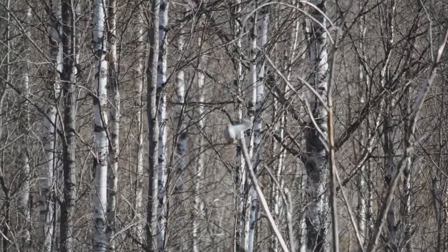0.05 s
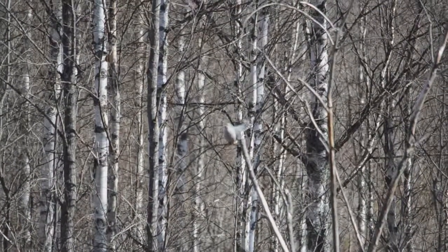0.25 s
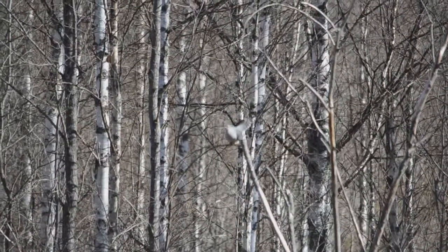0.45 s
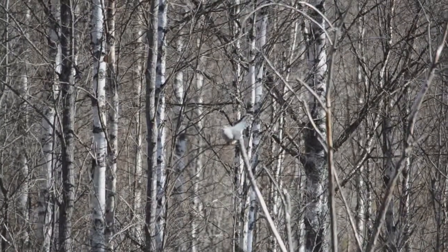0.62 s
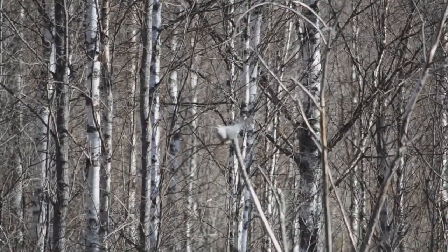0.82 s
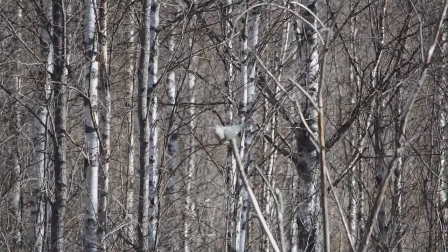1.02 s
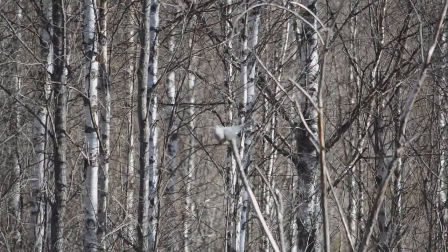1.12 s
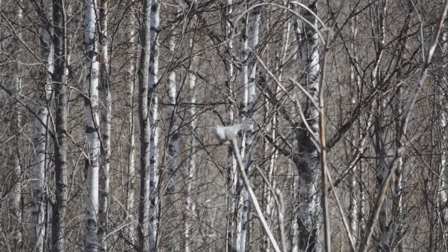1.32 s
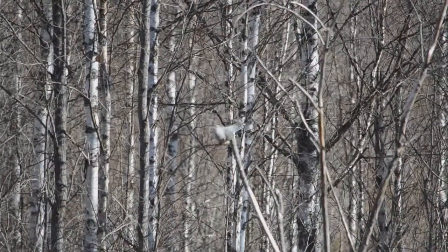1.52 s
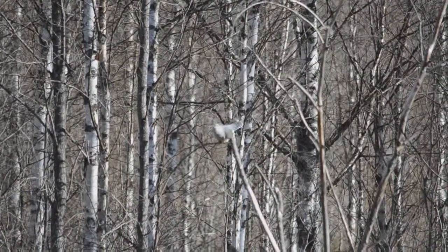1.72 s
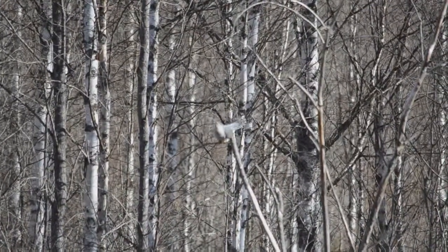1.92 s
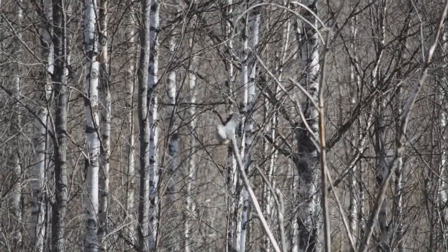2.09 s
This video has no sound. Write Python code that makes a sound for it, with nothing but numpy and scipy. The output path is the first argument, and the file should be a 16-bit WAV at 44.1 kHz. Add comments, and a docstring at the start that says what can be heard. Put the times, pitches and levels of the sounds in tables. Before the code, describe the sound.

A cuckoo calls in a leafless wood just after a soft knock near the microphone: a higher hoot, a lower one, then the higher one again. Each note echoes off the trunks over a faint hiss of wind.

```python
"""A soft knock sounds close by, then a cuckoo calls in a leafless birch wood:
an arched "cuck", a lower, level "oo", then another "cuck". Each note is a nearly pure hoot,
and the tree trunks send it back as distinct echoes and a long, scattered tail.
Faint wind hisses in the bare treetops, and electronics add a very thin whine."""
import sys
import numpy as np
from scipy import signal
from scipy.fft import rfft
from scipy.io import wavfile
from scipy.ndimage import uniform_filter1d

SR = 44100
rng = np.random.default_rng(int(sys.argv[2]) if len(sys.argv) > 2 else 0)


def persist_wave(psi):
    """Save psi, clipped to +-1, as 16-bit WAV."""
    counts = np.round(np.clip(psi, -1, 1) * 32767).astype(np.int16)
    wavfile.write(sys.argv[1], SR, np.atleast_2d(counts).T)


N = 94815
TIME = np.arange(N) / SR

# The shapes of the two notes. Each row: seconds into the note, pitch in Hz, level in dB.
CUCK_SHAPE = [(-.008, 500, -36), (0, 520, -27), (.006, 560, -17), (.011, 620, -9.5), (.02, 662, -4),
              (.032, 663, -2.3), (.046, 672, -1.2), (.062, 675, -.5), (.074, 671, -1.5), (.087, 643, -2.5),
              (.097, 600, -7), (.108, 555, -15), (.118, 510, -33)]
OO_SHAPE = [(0, 489.8, -32.5), (.012, 519.8, -8), (.024, 531.2, -1.5), (.055, 529.6, -1.5),
            (.09, 526.7, -3.5), (.128, 526.3, -6.5), (.17, 524, -4), (.198, 524.6, -4), (.214, 520.4, -9.5),
            (.226, 490, -26.5)]
# Each row is one "cuck": start in seconds, level in dB, pitch shift in Hz, overtone boost in dB.
CUCK_NOTES = [(.222, -23, 1.1, -0.5), (1.794, -24, 5, -2.5)]

def cuckoo():
    """The bird sings two arched notes with a lower one between them."""
    cucks = sum(hoot(CUCK_SHAPE, *note) for note in CUCK_NOTES)
    return cucks + hoot(OO_SHAPE, start=.573, db=-32, shift_hz=0, boost_db=7)


# How much the throat lets out of each overtone (a whole multiple of the pitch).
# Each row: frequency in Hz, level in dB against the main tone, before any boost.
THROAT_OVERTONES = [(1000, -41), (1330, -44.5), (2000, -58.5), (2800, -63.5), (3150, -59), (3380, -47.5),
                    (3650, -60.5), (4100, -61.5), (4800, -73)]
RASP_DB, RASP_FADE_S = 15.5, 0.02  # extra overtones as a note starts
OVERTONE_SWING = .45  # share of the note's swell in dB that the overtones follow

def hoot(shape, start, db, shift_hz, boost_db):
    """One note: a gliding pure tone with faint overtones from the throat, raspy at first."""
    seconds, hz, level_db = np.transpose(shape)
    age = TIME - start
    pitch = uniform_filter1d(np.interp(age, seconds, hz), size=260) + shift_hz
    swell = from_db(np.interp(age, seconds, level_db))
    singing = uniform_filter1d(1.0 * (age > seconds[0]) * (age < seconds[-1]), size=160)
    waver = 1 + 0.00061 * drift(rate_hz=150)
    phase = 2 * np.pi * np.cumsum(pitch * waver) / SR
    rasp_db = boost_db + RASP_DB * np.exp(-np.maximum(age, 0) / RASP_FADE_S)
    overtones = 0
    for k in range(2, 8):
        throat_db = np.interp(k * pitch, *np.transpose(THROAT_OVERTONES))
        overtones += from_db(rasp_db + throat_db) * np.sin(k * phase)
    return from_db(db) * singing * (swell * np.sin(phase) + swell ** OVERTONE_SWING * overtones)


# Echoes from groups of trees. Each row: delay in seconds, level in dB against the call.
TREE_ECHOES = [(0.0299, -17.5), (0.0479, -25.5), (0.0544, -16), (0.0681, -22), (0.0802, -24.5),
               (0.094, -25.5), (0.1062, -20), (0.1183, -33), (0.1278, -32.5), (0.1394, -21),
               (0.1781, -28.5), (0.1935, -24), (0.2104, -28), (0.288, -30), (0.3893, -30.5), (0.4546, -36),
               (0.5189, -27.5), (0.5985, -36)]

def wood_echoes(call):
    """The trees return the call as distinct echoes and a tail from near and far trunks."""
    echoes = sum(from_db(db) * np.interp(TIME - delay, TIME, call, left=0) for delay, db in TREE_ECHOES)
    near = from_db(-27.5) * trunk_scatter(fade_s=1)
    far = from_db(-22) * trunk_scatter(fade_s=3.8)
    return echoes + signal.fftconvolve(call, near + far)[:N]


def trunk_scatter(fade_s, build_s=0.31, top_hz=2500):
    """Countless tiny reflections build up and die away; scaled to a gain of 1 at the bird's pitch."""
    fade = np.exp(-np.log(1000) * TIME / fade_s)  # falls 60 dB in fade_s
    reflections = rng.standard_normal(N) * fade * (1 - np.exp(-TIME / build_s))
    reflections = signal.sosfilt(signal.butter(1, top_hz, fs=SR, output="sos"), reflections)
    hz = np.arange(N // 2 + 1) * SR / N
    bird_range = (hz > 510) & (hz < 690)
    return reflections / np.sqrt(np.mean(np.abs(rfft(reflections)[bird_range]) ** 2))


# The touches that make up the knock. Each row: start in seconds, strength in dB.
KNOCK_TOUCHES = [(0.1383, -44.5), (0.141, -35), (.146, -53)]
# The tones of the knocked object. Each row: pitch in Hz, level in dB, seconds to fade by 60 dB.
KNOCK_TONES = [(225, -2.5, 0.022), (480, -8.5, 0.015), (780, -14, 0.02), (1039, -10.5, .05),
               (1480, -13, .018), (1950, -15, 0.028), (2600, -17, .014), (3270, -20, .014)]
# Low bumps after the knock. Each row: start in seconds, strength in dB, pitch in Hz.
DULL_BUMPS = [(.168, -58, 130), (0.276, -56.5, 168)]

def knock():
    """A light touch, a firm one and a bounce ring a small object briefly; two dull bumps follow."""
    touches = band(sum(click(start, db) for start, db in KNOCK_TOUCHES), low_hz=140, high_hz=2940)
    tones = sum((-1) ** (k // 2) * from_db(db) * ring(touches, hz, fade_s)  # every other pair is flipped
                for k, (hz, db, fade_s) in enumerate(KNOCK_TONES))
    bumps = sum(ring(band(click(start, db), hz / 2, hz * 2), hz, fade_s=0.1)
                for start, db, hz in DULL_BUMPS)
    return tones + bumps


# The tone colour of wind plus microphone hiss. Each row: frequency in Hz, relative level in dB.
WIND_COLOUR = [(22, -11), (50, -4.5), (100, -2.5), (200, -5.5), (350, 0), (600, 2), (1000, -1.5),
               (1500, -7), (2000, -10.5), (3200, -19), (5000, -28), (7000, -31), (10000, -32.5),
               (15500, -36)]
WIND_DB, GUST_DB, FLUTTER_DB = -60, .5, 0.5

def wind():
    """Far treetops hiss: bands of noise swell slightly together, and each flutters on its own."""
    edges_hz = 22 * 2 ** np.arange(0, 10.1, .5)  # half an octave apart
    hz, db = np.transpose(WIND_COLOUR)
    noise = rng.standard_normal((2, N))
    gust_db = GUST_DB * drift(rate_hz=0.96)
    hiss = 0
    for k, (low, high) in enumerate(zip(edges_hz, edges_hz[1:])):
        level_db = np.interp(np.log(low * high) / 2, np.log(hz), db)  # at the middle of the band
        flutter_db = FLUTTER_DB * drift(rate_hz=17)
        hiss += from_db(level_db + gust_db + flutter_db) * band(noise[k % 2], low, high)
    return from_db(WIND_DB) * rms_one(hiss)


# The tones of the whine. Each row: pitch in Hz, average (rms) level in dB.
WHINE_TONES = [(7500, -101), (15694, -87)]

def whine():
    """The electronics give off thin, steady tones."""
    return sum(from_db(db) * np.sqrt(2) * np.sin(2 * np.pi * hz * TIME) for hz, db in WHINE_TONES)


def from_db(db):
    """Turn decibels into a number to multiply by."""
    return 10 ** (np.asarray(db) / 20)


def rms_one(x):
    """Scale a signal to an average (rms) size of 1."""
    return x / np.sqrt(np.mean(x ** 2) + 1e-20)


def band(x, low_hz, high_hz):
    """Keep the sound between two frequencies."""
    edges_hz = [low_hz, min(high_hz, SR / 2 - 100)]
    return signal.sosfilt(signal.butter(2, edges_hz, "band", fs=SR, output="sos"), x)


def drift(rate_hz):
    """A smooth random wobble of about size 1; a higher rate wobbles faster."""
    memory = np.exp(-80 * np.pi * rate_hz / SR)
    noise = rng.standard_normal(N // 40 + 2002)  # one value per 40 samples, plus a run-up
    smooth = signal.lfilter([1], [1, -2 * memory, memory * memory], noise)[2000:]
    return np.interp(np.arange(N) / 40, np.arange(len(smooth)), rms_one(smooth))


def click(start, db):
    """A click one sample long."""
    return from_db(db) * (np.arange(N) == int(start * SR))


def ring(clicks, hz, fade_s):
    """Each click starts a pure tone that fades by 60 dB in fade_s seconds."""
    decay = np.exp(-np.log(1000) / (fade_s * SR))
    angle = 2 * np.pi * hz / SR
    return signal.lfilter([0, np.sin(angle)], [1, -2 * decay * np.cos(angle), decay ** 2], clicks + 1e-18)


def scene():
    """The bird, its echoes and the quiet sounds around it, in one channel."""
    call = cuckoo()
    return (call + wood_echoes(call) + wind() + knock() + whine())[None]


def record(dry):
    """Cut away the very highest treble steeply."""
    cutoff_hz = 15850
    return signal.sosfilt(signal.ellip(12, .1, 80, cutoff_hz, fs=SR, output="sos"), dry)


dry = scene()
out = record(dry)
persist_wave(out)
```